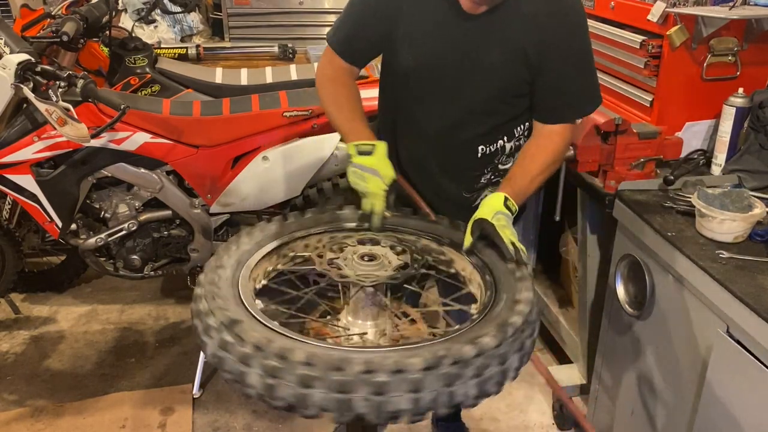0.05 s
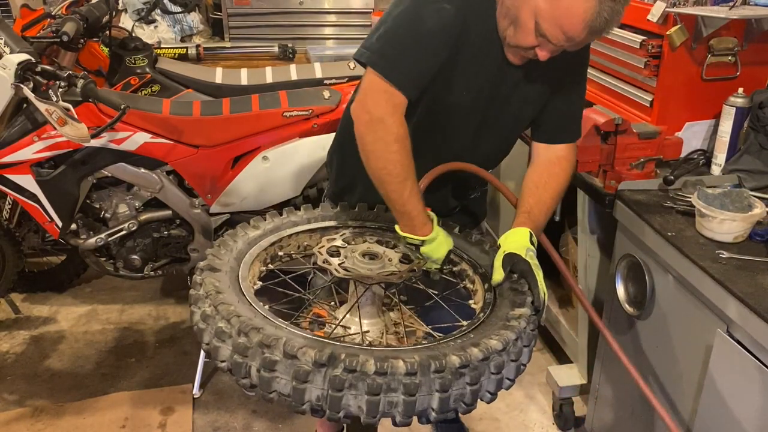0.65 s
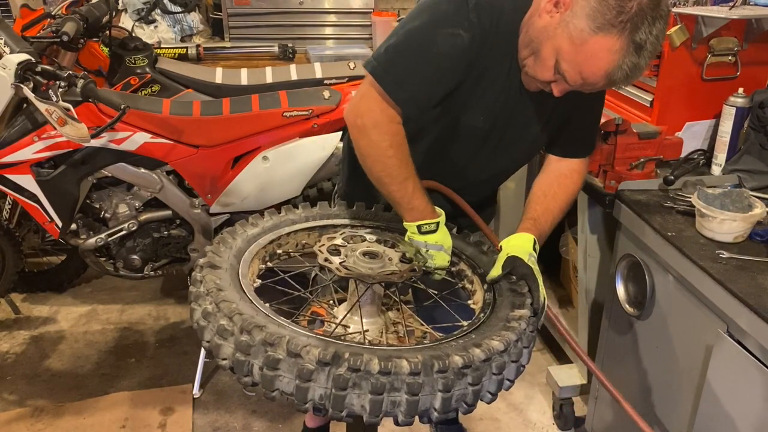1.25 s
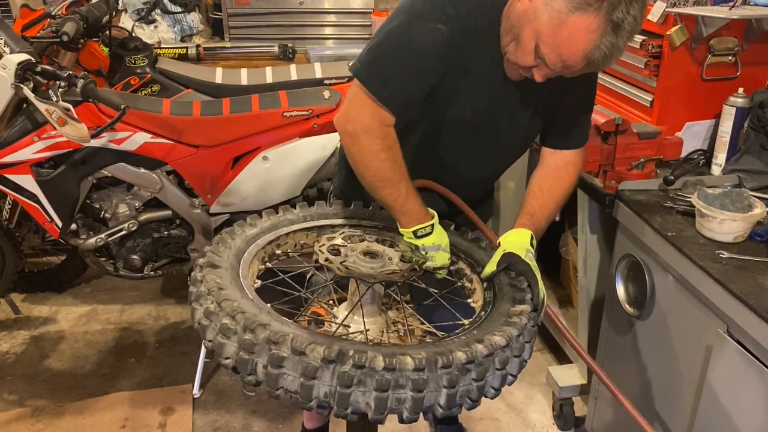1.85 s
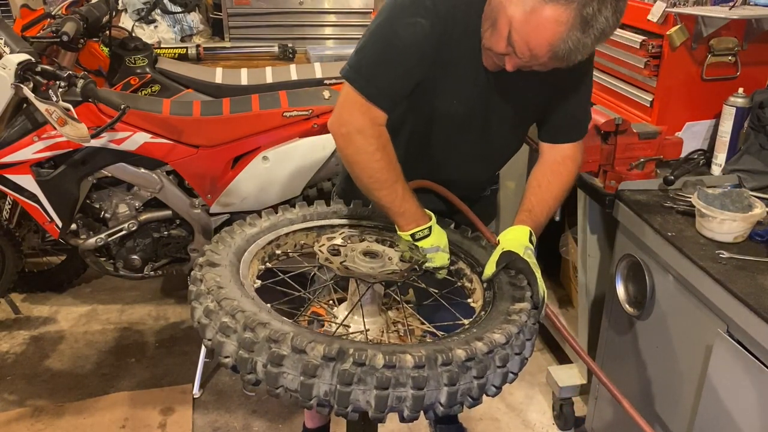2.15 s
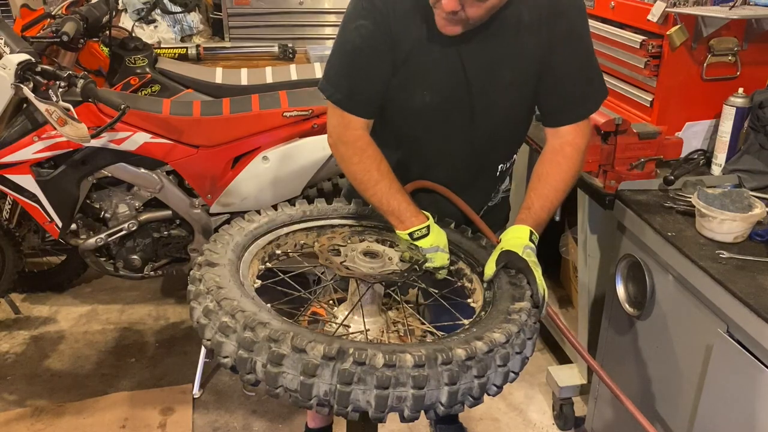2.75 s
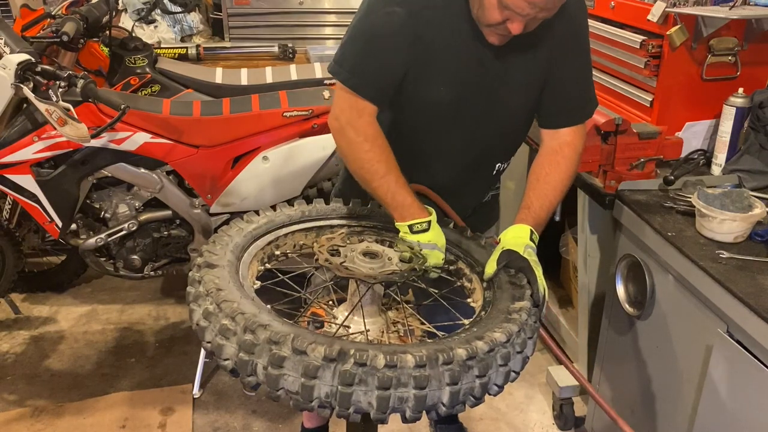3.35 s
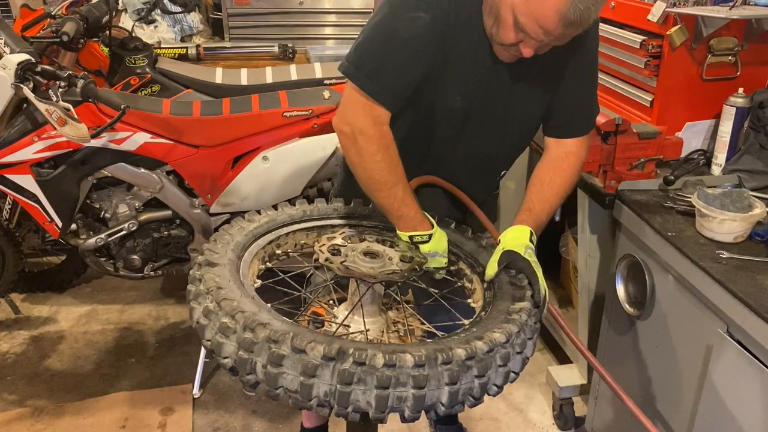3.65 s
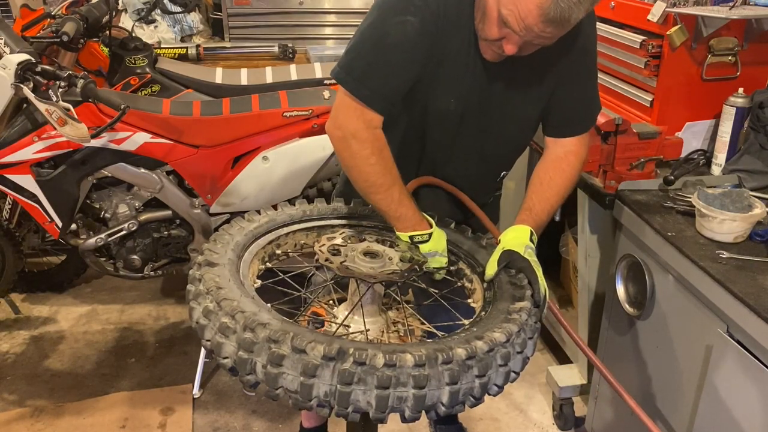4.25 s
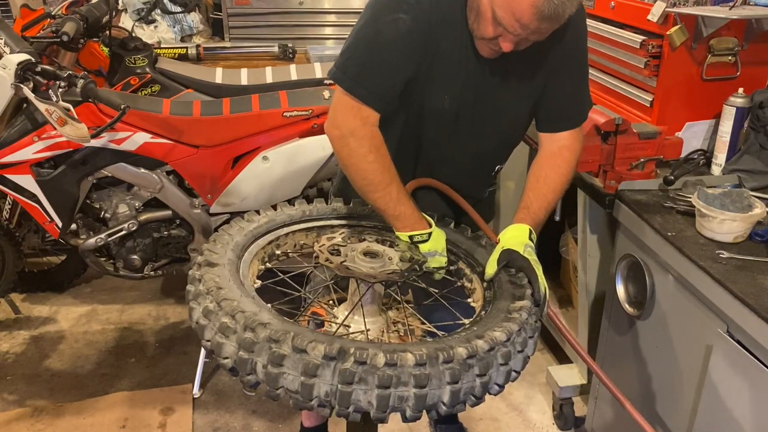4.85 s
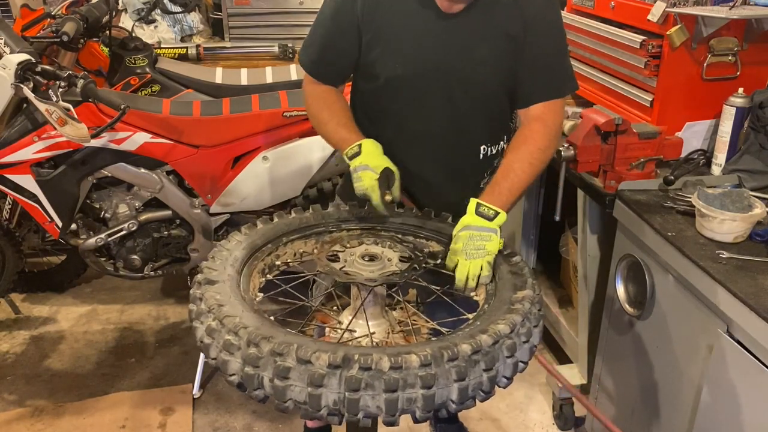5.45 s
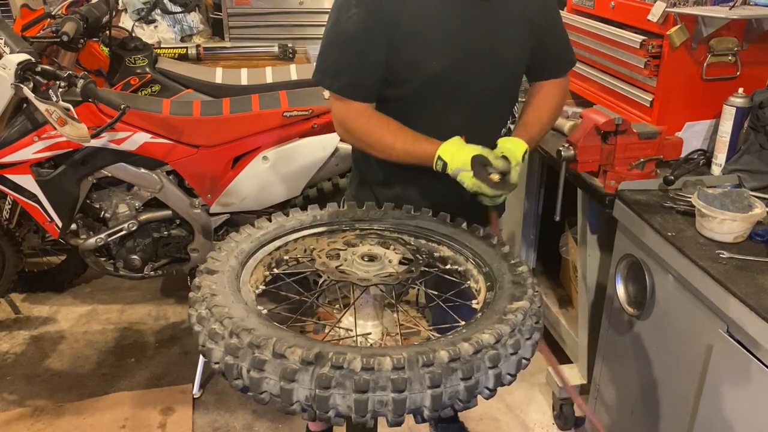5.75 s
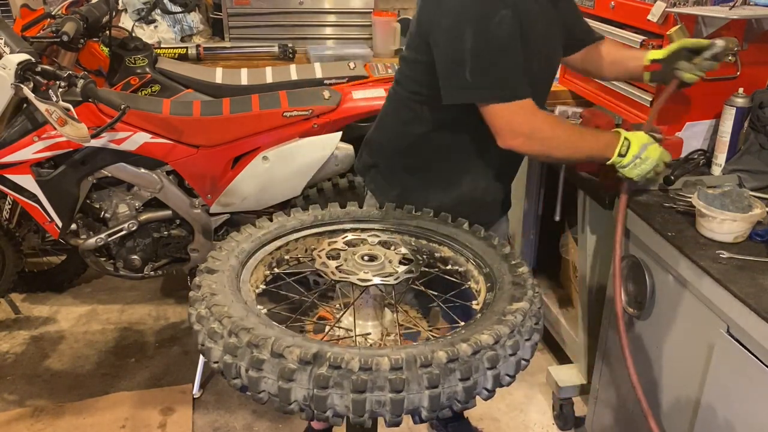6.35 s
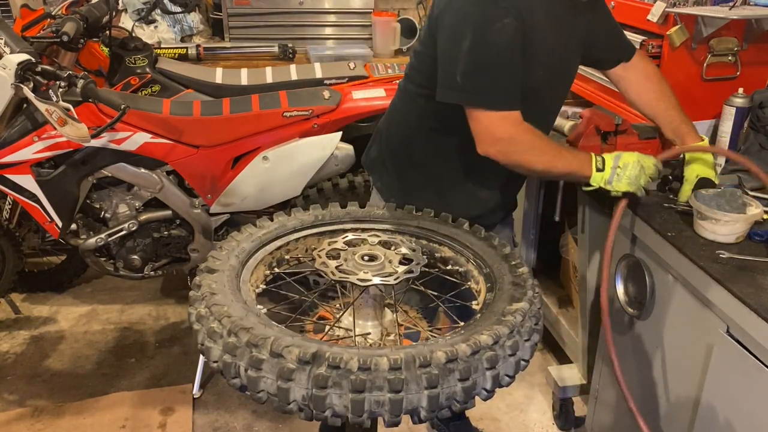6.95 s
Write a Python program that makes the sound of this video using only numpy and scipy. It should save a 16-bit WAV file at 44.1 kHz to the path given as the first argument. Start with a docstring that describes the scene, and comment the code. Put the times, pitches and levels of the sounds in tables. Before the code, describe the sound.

An air hose leaks and fills a tyre twice, ending with a sharp coupler pop and a bright metallic clink on a bench.

```python
"""A cluttered garage, one microphone within arm's reach of a motorcycle tyre being filled from an air hose.
Air leaks round the chuck and rushes through the valve; the chuck spits each time it shifts, then comes
off and knocks on the wheel. The hose coupler hisses until it is pulled apart with a pop, close to the
microphone. A steel fitting rings on the bench, just as close, and the hose is laid down.
Behind it all lie a low rumble and the hum of a distant motor."""
import sys
import numpy as np
from scipy import signal
from scipy.fft import rfft, irfft
from scipy.io import wavfile

SR = 44100
rng = np.random.default_rng(int(sys.argv[2]) if len(sys.argv) > 2 else 0)


def transcribe(signal):
    """Save signal, clipped to [-1, 1], as a 16-bit WAV file at the path in sys.argv[1]."""
    frames = np.atleast_2d(signal).T
    limited = np.clip(frames, -1, 1)
    pcm = np.round(limited * 32767).astype(np.int16)
    wavfile.write(sys.argv[1], SR, pcm)


N = 308700
TIME = np.arange(N) / SR


def from_db(db):
    """Decibels to gain."""
    return 10 ** (np.asarray(db) / 20)


def rms_one(x):
    """Scale to unit rms."""
    return x / np.sqrt(np.mean(x ** 2) + 1e-20)


def since(s):
    """Seconds gone by since time s, zero before."""
    return np.maximum(TIME - s, 0)


def drift(rate_hz):
    """Slow random wander, roughly between -1 and 1."""
    knots = rng.standard_normal(2048)
    return np.interp(TIME * rate_hz, np.arange(len(knots)), knots)


def swell(s, half_width):
    """A smooth bell of height 1 around time s."""
    return np.exp(-np.minimum(((TIME - s) / half_width) ** 2 / 2, 40))


def burst(s, rise_s, decay_s):
    """A bell-shaped rise up to time s, then an exponential fall."""
    t = TIME - s
    return np.exp(-np.minimum(np.where(t < 0, (t / rise_s) ** 2 / 2, t / decay_s), 40))


def airflow(start, end, attack_s=0.011, release_s=0.014):
    """The envelope of a stream of air: quick attack, hold, exponential release."""
    return np.clip((TIME - start) / attack_s, 0, 1) * np.exp(-np.clip((TIME - end) / release_s, 0, 40))


def ring(s, hz, t60_s):
    """A decaying sine that starts at time s."""
    out, start = np.zeros(N), int(s * SR)
    t = TIME[:min(N - start, SR)]
    out[start:start + len(t)] = np.sin(2 * np.pi * hz * t) * from_db(-60 * t / t60_s)
    return out


def metal(modes, s, build_s):
    """A glancing contact pumps the modes up while it lasts, then leaves them ringing."""
    pumped = np.clip((TIME - s) / build_s, 0, 1) ** 2
    return pumped * sum(from_db(db) * ring(s, hz, t60) for hz, db, t60 in modes)


def noise(spectrum):
    """Unit-rms noise coloured by rows of freq_hz, gain_db."""
    hz, db = np.transpose(spectrum)
    log_hz = np.log(np.maximum(np.fft.rfftfreq(N, 1 / SR), 1))
    skirt = np.minimum(np.exp(2 * (log_hz - np.log(hz[0]))), 1)  # falls away below the first point
    colour = skirt * from_db(np.interp(log_hz, np.log(hz), db))
    return rms_one(irfft(rfft(rng.standard_normal(N)) * colour, N))


def jet(spectrum, flutter_db):
    """Turbulent air through a narrow opening; its strength flutters."""
    return noise(spectrum) * from_db(flutter_db * drift(45))


def narrow_tone(hz, width_hz):
    """A narrow band of noise carried on a resonance; unit rms."""
    wobble = signal.sosfilt(signal.butter(2, width_hz, fs=SR, output="sos"), rng.standard_normal((2, N)))
    phase = 2 * np.pi * np.cumsum(hz * np.ones(N)) / SR
    return rms_one(wobble[0] * np.cos(phase) + wobble[1] * np.sin(phase))


def resonances(x, peaks):
    """Colour a sound with peaks and dips."""
    hz = np.fft.rfftfreq(N, 1 / SR)
    gain_db = sum(db / (1 + (2 * (hz - centre) / width) ** 2) for centre, width, db in peaks)
    return irfft(rfft(x) * from_db(gain_db), N)


# spectra of the garage's rumble and air: freq_hz, gain_db
RUMBLE = [(12, -9), (20, 6.5), (45, -6.5), (75, -10), (142, -17.5), (300, -25.5), (419, -25), (484, -24.5),
          (524, -30.5), (818, -32), (900, -45), (1170, -60.5), (1980, -120)]
ROOM_AIR = [(500, -20), (1000, 2.5), (2000, -9), (4000, -15), (9000, -17.5), (12000, -25.5), (16000, -33.5)]
# a motor far from the microphone: pitch_hz, level_db
MOTOR_HUM = [(291, -77), (474, -68.5), (711, -79.5)]


def room_tone():
    """Low rumble, faint room air and a wavering motor hum."""
    hum = sum(from_db(db) * np.sqrt(2) * np.sin(2 * np.pi * hz * TIME + 0.82 * drift(24))
              for hz, db in MOTOR_HUM)
    rumble = from_db(-50.5) * noise(RUMBLE) * from_db(0.49 * drift(4.9))
    return rumble + from_db(-70.5) * noise(ROOM_AIR) + hum


# reflections off wheel, bench, floor and cabinets: delay_s, gain_db
ECHOES = [(.0046, -21.5), (.0072, -24), (0.0134, -20.5), (0.0206, -17)]


def garage(x, t60_s=0.16, tail_db=-14, wall_hz=7000):
    """What the room sends back to the microphone: near reflections and a short, dull tail."""
    t = TIME[:SR // 2]
    tail = rng.standard_normal(len(t)) * from_db(-60 * t / t60_s) * np.clip(t / .008, 0, 1)
    response = from_db(tail_db) * tail / np.sqrt(np.sum(tail ** 2))
    for delay, db in ECHOES:
        response[int(delay * SR)] += from_db(db)
    response = signal.sosfilt(signal.butter(1, wall_hz, fs=SR, output="sos"), response)
    return signal.fftconvolve(x, response)[:N]


# low, middle and high bands of contact noise: low_hz, high_hz
CONTACT_BANDS = [(130, 660), (650, 2570), (2800, 8400)]


def contact_noise(contacts, grain_db=1.5):
    """Surfaces touch: grainy noise in three bands, played by pairs of envelope, tilt_db_per_band."""
    out = np.zeros(N)
    for step, band in enumerate(CONTACT_BANDS, -1):
        level = sum(envelope * from_db(step * tilt_db) for envelope, tilt_db in contacts)
        bandpass = signal.butter(2, band, "band", fs=SR, output="sos")
        out += level * rms_one(signal.sosfilt(bandpass, rng.standard_normal(N)))
    return out * from_db(grain_db * drift(250))


# the tyre is gripped or the hose dragged: peak_s, level_db
SHOVES = [(.02, -47), (.88, -56), (3.21, -53.5), (5.04, -43.5), (6.38, -43.5), (6.799, -60)]
# spectrum of rumbling rubber: freq_hz, gain_db
RUBBER = [(55, -3.5), (80, 0.5), (135, -2), (190, -14), (400, -31.5), (1500, -71.5)]


def handling(hold_db=-66.5, scuffs_per_s=59, scuff_db=-18, scuff_decay_s=0.018):
    """Rubber rumbles faintly while held; each shove raises the rumble and sets off random scuffs."""
    effort = sum(from_db(db) * burst(s, rise_s=0.021, decay_s=0.19) for s, db in SHOVES)
    slips = (rng.random(N) < scuffs_per_s / SR) * from_db(scuff_db + 3 * rng.standard_normal(N))
    scuffs = signal.lfilter([1], [1, -np.exp(-1 / (scuff_decay_s * SR))], effort * slips + 1e-18)
    rumble = (effort + from_db(hold_db)) * noise(RUBBER)
    return rumble + contact_noise([(scuffs, -6)])


# dull thuds of the tyre: start_s, level_db, pitch_hz
THUDS = [(0.169, -29, 328), (.9, -32, 361), (2.469, -31.5, 181), (4.946, -24, 270), (5.109, -27, 304)]
# the wheel on its stand: start_s, level_db
ROCKS = [(2.471, -33.5), (2.741, -36), (5.199, -41)]
# spokes, as the wheel is turned into place: pitch_hz, level_db, t60_s
SPOKES = [(695, -50, 0.98), (1037, -53, 0.82)]


def bumps():
    """The tyre thuds, the wheel rocks on its stand, and at first the spokes still ring."""
    thuds = sum(from_db(db) * ring(s, hz, t60_s=0.078) for s, db, hz in THUDS)
    rocking = sum(from_db(db) * ring(s, hz=43.2, t60_s=0.5) for s, db in ROCKS)
    spokes = sum(from_db(db) * ring(0, hz, t60) for hz, db, t60 in SPOKES)
    return thuds + rocking + spokes


# modes of the wheel, and of the chuck ticking on the valve stem: pitch_hz, level_db, t60_s
WHEEL_MODES = [(520, -35.5, 0.23), (707, -33, 0.13), (900, -31.5, 0.14), (1040, -28.5, .1),
               (1604, -19, 0.06), (1895, -24.5, 0.087), (3120, -26.5, 0.1), (3300, -42, 0.1),
               (5000, -42, 0.1), (5170, -35, .08), (5900, -39, .07)]
TICK_MODES = [(1143, -35.5, 0.046), (1220, -37, 0.042), (2030, -20, 0.015)]
WHEEL_HIT_S, TICK_S = 5.124, 0.7045


def clanks():
    """The chuck sets metal ringing: the valve stem early on, the wheel as it comes off."""
    return metal(TICK_MODES, TICK_S, build_s=0.0014) + metal(WHEEL_MODES, WHEEL_HIT_S, build_s=0.011)


# chuck and hose on wheel and bench: peak_s, mid_band_db, tilt_db_per_band, decay_s
KNOCKS = [(.1685, -39, -3.5, 0.025), (.854, -49, -6, 0.022), (.902, -50, -7.5, 0.02),
          (1.106, -46.5, 7, 0.015), (1.272, -53, -7, .01), (1.6291, -30, 0, .001),
          (3.461, -55.5, -3.5, 0.012), (5.006, -46.5, -1, 0.015), (5.1095, -33.5, -7, .005),
          (5.131, -39, -0.5, 0.026), (6.533, -60.5, 2.5, 0.015), (6.616, -58, -2, 0.046),
          (6.715, -48, -.5, 0.021), (6.928, -61, 1.5, .02)]
# gloves and hose over rubber: peak_s, mid_band_db, tilt_db_per_band, decay_s
RUBS = [(.015, -52.5, -1.5, 0.14), (3.215, -55.5, -2, 0.045), (3.626, -56, -7, 0.021),
        (5.238, -54.5, -7, 0.037), (5.52, -64.5, -11, 0.045), (6.174, -55, 0.5, 0.036),
        (6.368, -46.5, -7, 0.037)]


def knocks_and_rubs(rise_share=0.17, rub_rise_s=0.013):
    """Contacts on rubber and damped metal; softer knocks both rise and fall more slowly."""
    stem_click = (TICK_S, -40.5, 5.6, 0.0016)
    hits = [(from_db(db) * burst(s, rise_share * decay, decay), tilt_db)
            for s, db, tilt_db, decay in [*KNOCKS, stem_click]]
    rubs = [(from_db(db) * burst(s, rub_rise_s, decay), tilt_db) for s, db, tilt_db, decay in RUBS]
    return contact_noise(hits + rubs)


def voiced(hz, db, t60, tilt_db_per_octave=-1.0, pivot_hz=7500, ring_scale=1.033):
    """Tilt one mode's level toward the low partials and scale its decay."""
    return hz, db + tilt_db_per_octave * np.log2(hz / pivot_hz), t60 * ring_scale


# the steel fitting's modes: pitch_hz, first_touch_db, second_touch_db, t60_s
FITTING_MODES = [ (1335, -52, -70, .55), (1766, -35, -65, .3), (1808, -40, -65, .22), (2024, -42, -70, .27),
                 (3210, -33, -65, .25), (3262, -39, -65, .18), (3370, -42, -65, .25), (3949, -30, -75, .15),
                 (4186, -34, -70, .25), (4915, -37, -80, .18), (5128, -25.5, -50, .38),
                 (5175, -22, -45, .39), (6519, -33, -60, .27), (7153, -36, -28, .5), (7568, -6.3, -60, .19),
                 (8156, -29, -70, .17), (8387, -28, -55, .42), (8432, -38, -44, .35), (9092, -52, -58, .65),
                 (9598, -46, -70, .2), (10423, -30, -80, .14), (10724, -38, -38, .35),
                 (13135, -58, -75, .5), (13555, -37, -75, .21), (14876, -42, -70, .27),
                 (15665, -62, -70, .5)]
FIRST_TOUCH_S, SECOND_TOUCH_S = 6.3645, 6.428


def fitting(skid_db=5.0, waver_db=5.0, second_trim_db=-1.0):
    """The fitting skids on steel and touches again; the ring wavers as the hand carries it on."""
    first = metal([voiced(hz, db, t60) for hz, db, _, t60 in FITTING_MODES], FIRST_TOUCH_S, 0.01)
    second = metal([voiced(hz, db, t60) for hz, _, db, t60 in FITTING_MODES], SECOND_TOUCH_S, 0.0058)
    skid = burst(FIRST_TOUCH_S + 0.02, rise_s=0.0075, decay_s=0.0076)
    return first * from_db(skid_db * skid) + second * from_db(second_trim_db + waver_db * drift(50))


def scraping(lag_s=0.008, rise_s=0.0064):
    """The fitting scrapes over steel at each touch and squeaks as it slides on the second."""
    first = from_db(-39) * burst(FIRST_TOUCH_S + lag_s, rise_s, decay_s=0.016)
    second = from_db(-53.5) * burst(SECOND_TOUCH_S + lag_s, rise_s, decay_s=0.012)
    squeak = from_db(-34.5) * swell(SECOND_TOUCH_S + lag_s, rise_s) * narrow_tone(8600, width_hz=110)
    return contact_noise([(first, 7), (second, 16)]) + squeak


def seal_release(rows, colour, lead_s, ragged_db, split_hz=1100):
    """A seal opens for an instant: a two-sided pressure pulse, and a ragged rush of air just behind it."""
    air = noise(colour) * from_db(ragged_db * drift(280))
    bass = signal.sosfiltfilt(signal.butter(2, split_hz, fs=SR, output="sos"), air)
    out = np.zeros(N)
    for s, rush_db, bass_db, rise, decay, pulse_db, half_width in rows:
        out += from_db(rush_db) * burst(s, rise, decay) * (air + (from_db(bass_db) - 1) * bass)
        pulse_time = np.clip((TIME - s + lead_s) / half_width, -9, 9)
        out += from_db(pulse_db) * pulse_time * np.exp((1 - pulse_time ** 2) / 2)
    return out


# the coupler letting go: peak_s, rush_db, bass_gain_db, rise_s, decay_s, pulse_db, pulse_half_width_s
POP = [(6.0748, -7, -0.098, 0.00093, 0.0017, -6.5, 0.00076),
       (6.0795, -21, -0.84, 0.002, 0.011, -19, 0.00087)]
# spectrum of its rush: freq_hz, gain_db
POP_COLOUR = [(100, -4.5), (420, 10.5), (680, 11), (850, -2), (1100, -3), (1500, 6), (2100, -8), (2700, -3),
              (4800, -8.5), (6500, -3.5), (9500, 4), (12000, -3), (16000, -21)]
# hose and cupped hands: pitch_hz, level_db, t60_s
POP_MODES = [(181, -25, 0.041), (222, -27.5, .06), (400, -26.5, 0.054), (537, -31, 0.066),
             (640, -22.5, 0.064), (684, -25.5, 0.046), (2000, -15.5, 0.019), (3123, -24.5, 0.04),
             (5830, -18, 0.02), (7070, -16, 0.019)]


def pop():
    """The coupler parts close to the microphone and the trapped air bangs out of the hose."""
    bang = seal_release(POP, POP_COLOUR, lead_s=0.0009, ragged_db=1.5)
    return bang + sum(from_db(db) * ring(POP[0][0], hz, t60) for hz, db, t60 in POP_MODES)


# the chuck spits as it shifts: peak_s, rush_db, bass_gain_db, rise_s, decay_s
SPITS = [(1.639, -26.5, 4.5, 0.005, 0.0079), (3.1638, -22, 0, 0.0015, 0.0043),
         (3.5573, -22, -4, 0.001, 0.0069), (4.9479, -21, 1.5, .0013, 0.005)]
# spectrum of a spit: freq_hz, gain_db
SPIT_COLOUR = [(60, -15), (350, 5), (520, -9), (700, 3), (950, -12), (1500, -6.5), (2100, 0.5), (4000, -5),
               (7000, 0.5), (10000, 3.5), (12000, -5), (16000, -17)]


def spits(pulse_s=0.0016, puff_lag_s=0.007, puff_db=-14, puff_decay_s=0.015, puff_pulse_s=0.0037):
    """Each spit is a sharp rush of air, then a weaker and longer puff as the seal settles."""
    rows = []
    for s, db, bass_db, rise, decay in SPITS:
        pulse_db = db + bass_db - 9
        rows.append((s, db, bass_db, rise, decay, pulse_db, pulse_s))
        rows.append((s + puff_lag_s, db + puff_db, bass_db, rise, puff_decay_s,
                     pulse_db + puff_db / 2, puff_pulse_s))
    return seal_release(rows, SPIT_COLOUR, lead_s=0.0021, ragged_db=5.0)


# shifts of the hand: centre_s, half_width_s, gain_db
GRIP_SHIFTS = [(.01, 0.065, 8), (.34, 0.078, 3), (.73, .05, 4), (1.4, 0.03, 5), (1.51, 0.034, -2),
               (3.4, 0.16, 0.5), (4.5, 0.34, 2.5), (5.76, 0.065, 5)]


def grip():
    """The hand shifts its grip, and more or less air passes; the change in dB."""
    return sum(db * swell(s, half_width) for s, half_width, db in GRIP_SHIFTS)


# spectra of the coupler's leak and its whistling edge: freq_hz, gain_db
COUPLER_JET = [(600, -11.5), (1700, -7.5), (3200, -1.5), (5000, -3), (6500, -0.5), (8000, 4), (10000, 2.5),
               (12000, -3), (14000, -11.5), (16000, -19.5)]
COUPLER_EDGE = [(4500, -32), (5600, -15), (6100, -3.5), (7200, -0.5), (8200, -8), (9800, -4), (12000, -23)]
# share of that edge as the coupler turns in the hand: time_s, gain_db
EDGE_SHARE = [(4.95, -25), (5.1, .5), (5.57, 2.5), (5.66, -22), (5.88, -2), (6.1, -9)]


def coupler(grip_db, start_s=4.96, end_s=6.07, sag_db_per_s=1.2, glove_delay_s=0.0021):
    """The coupler leaks while it is carried; a faint reflection off the glove sweeps through the hiss."""
    level = airflow(start_s, end_s) * from_db(-48.5 - sag_db_per_s * since(start_s) + grip_db)
    edge_share = from_db(np.interp(TIME, *np.transpose(EDGE_SHARE), left=-140, right=-140))
    hiss = level * (jet(COUPLER_JET, flutter_db=2.5) + edge_share * jet(COUPLER_EDGE, flutter_db=2.5))
    reflection = np.interp(TIME - glove_delay_s * (1 + .1 * drift(3.3)), TIME, hiss)
    return hiss + .2 * reflection


# spectra of the two leaks round the chuck: freq_hz, gain_db
THIN_JET = [(1500, -31), (4000, -19), (6500, -4), (8500, -1), (10200, 2), (11200, -3), (12200, -10.5),
            (14000, -13), (16000, -20)]
WIDE_GAP = [(300, -4), (900, -5), (1500, -0.5), (2300, 3), (3100, 0), (4000, -5.5), (4700, -4), (6500, -8),
            (10000, -9.5), (14000, -32)]
# peaks and dips of the chuck's bore: centre_hz, width_hz, gain_db
CHUCK_BORE = [(2980, 130, 0.5), (3980, 200, -2.5), (4540, 220, 1.5), (5600, 150, 1), (6850, 400, -1)]
# two tries, each a leak and then a fill: leak_start_s, seated_s, fill_end_s, thin_gain_db, fill_gain_db
TRIES = [(-.02, 1.64, 3.17, -53.5, -55.5), (3.175, 3.56, 4.95, -53, -59.5)]


def leaking(grip_db, gap_db=-46, shut_db=-18.5, opening_s=0.65, gap_follows=0.4, wander_db=1.0):
    """A thin jet escapes past the askew chuck at once; the leak slowly prises a wider, duller gap open."""
    thin, wide = 0, 0
    for start, seated, _, thin_db, _ in TRIES:
        flow = airflow(start, seated)
        shut = np.clip(1 - since(start) / opening_s, 0, 1)
        thin += flow * from_db(thin_db + grip_db)
        wide += flow * from_db(gap_db + gap_follows * grip_db + shut_db * shut)
    unsteady_hand = from_db(wander_db * drift(8.3))
    hiss = thin * unsteady_hand * jet(THIN_JET, flutter_db=1.5) + wide * jet(WIDE_GAP, flutter_db=2.4)
    return resonances(hiss, CHUCK_BORE)


def valve_tone(start, end, from_hz=3350, to_hz=2810, sink_s=0.55, attack_s=0.14, fade_db_per_s=10):
    """The valve's hollow tone glides down and fades as the chuck settles."""
    t = since(start)
    hz = to_hz + (from_hz - to_hz) * np.exp(-t / sink_s)
    level = airflow(start, end) * np.minimum(t / attack_s, 1) * from_db(-56 - fade_db_per_s * t)
    return level * narrow_tone(hz, width_hz=200)


# resonances of valve stem and chuck: centre_hz, width_hz, gain_db
STEM_PEAKS = [(2610, 64, -3), (4230, 49, 5), (6080, 190, 5), (8140, 650, 5), (9300, 150, 4.5)]


def tyre_cavity(x, lap_hz=199, lap_gain=0.25):
    """Air in the tyre rings once per lap of the torus; the valve stem adds its own narrow peaks."""
    hz = np.fft.rfftfreq(N, 1 / SR)
    laps = 1 / (1 - lap_gain * np.exp(-2j * np.pi * hz / lap_hz))
    return resonances(irfft(rfft(x) * laps, N), STEM_PEAKS)


# spectra of air through the valve on each fill: freq_hz, gain_db
FIRST_FILL = [(600, 0.5), (1200, -1.5), (1900, -8), (2350, -10.5), (2520, 0.5), (3000, -0.5), (3900, -4.5),
              (6000, -7), (8600, -9.5), (10000, -13.5), (11200, -14), (13000, -26), (16000, -27)]
SECOND_FILL = [(600, -0.5), (1200, -6.5), (1900, -9.5), (2380, -12), (2550, 2), (2750, -3), (5000, -3),
               (8800, -4.5), (11000, -8.5), (12500, -17), (13300, -21), (16000, -26)]


def inflating(grip_db, onset_db=13, settle_s=0.14, whistle_hz=2548, whistle_follows=4.3):
    """The hiss starts loud as the leak dies away, then settles into the first fill; the second whistles."""
    (_, start, end, _, first_db), (_, restart, stop, _, second_db) = TRIES
    onset = np.exp(-since(start) / settle_s)
    first = airflow(start, end) * from_db(first_db + onset_db * onset) * jet(FIRST_FILL, flutter_db=1.1)
    first += valve_tone(start, end)
    second = from_db(second_db + grip_db) * jet(SECOND_FILL, flutter_db=1.4)
    whistle = from_db(-79.5 + whistle_follows * grip_db) * narrow_tone(whistle_hz, width_hz=40)
    return from_db(-1.5) * tyre_cavity(first + airflow(restart, stop) * (second + whistle))


def scene():
    """The wheel is at arm's reach from the microphone; the pop and the fitting are nearer and drier."""
    grip_db = grip()
    air = from_db(-2.5) * (leaking(grip_db) + inflating(grip_db) + coupler(grip_db)) + spits()
    at_wheel = air + knocks_and_rubs() + handling() + bumps() + clanks()
    close_up = pop() + from_db(0.6) * fitting() + scraping()
    reflections = garage(at_wheel + from_db(-3.0) * close_up)
    return (at_wheel + close_up + reflections + room_tone())[None]


def record(dry):
    """The pop overloads the microphone input; the top is cut above 15.9 kHz."""
    lowpass = signal.ellip(10, .1, 80, 15900, fs=SR, output="sos")
    return signal.sosfilt(lowpass, np.clip(dry, -.95, .95))


dry = scene()
out = record(dry)
transcribe(out)
```